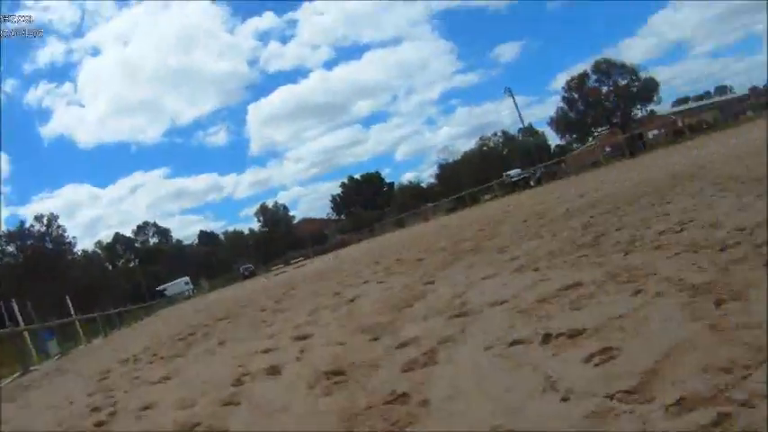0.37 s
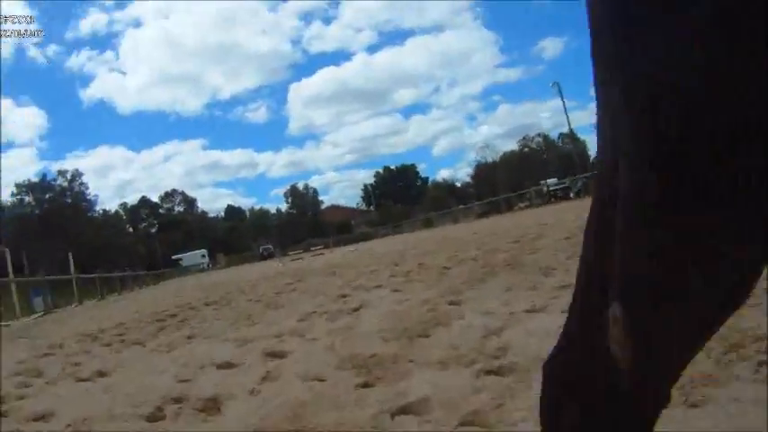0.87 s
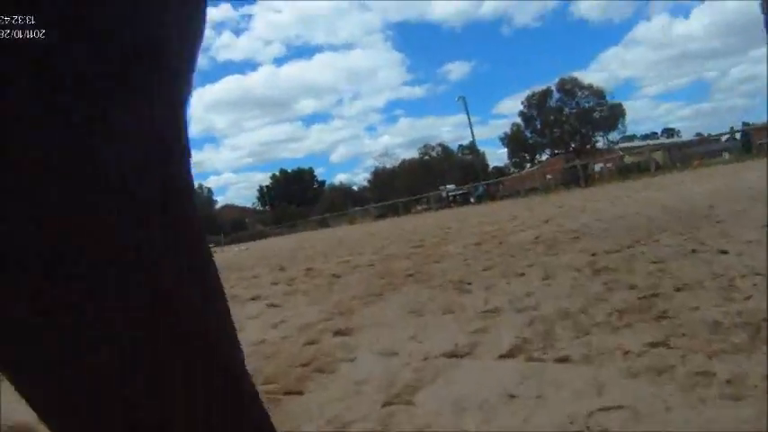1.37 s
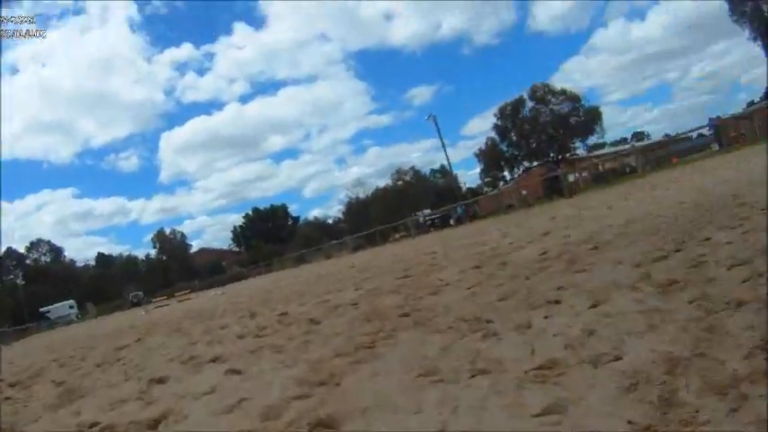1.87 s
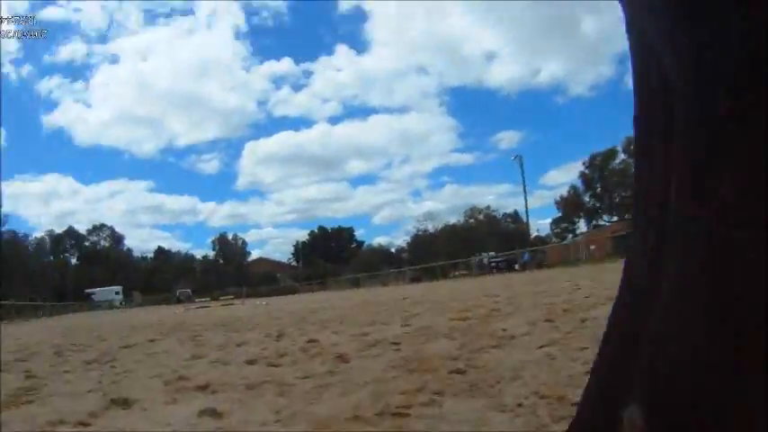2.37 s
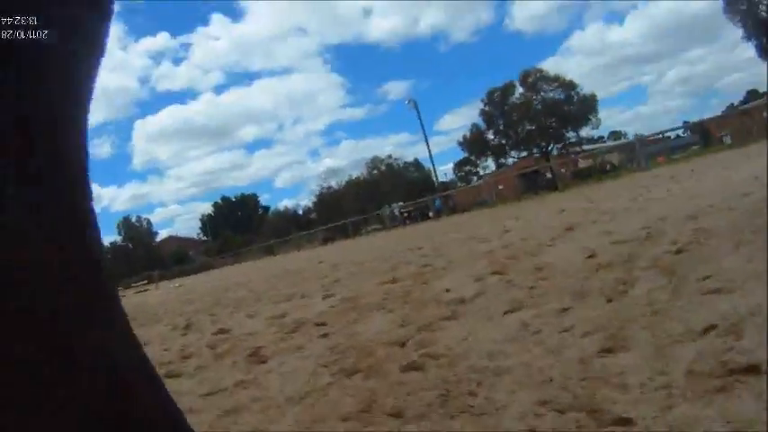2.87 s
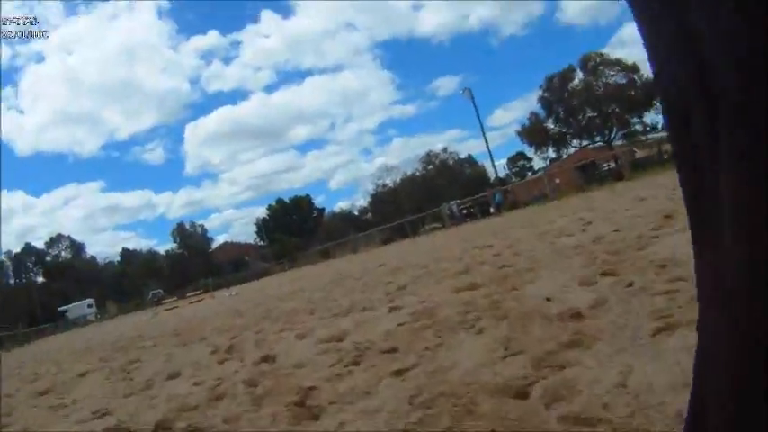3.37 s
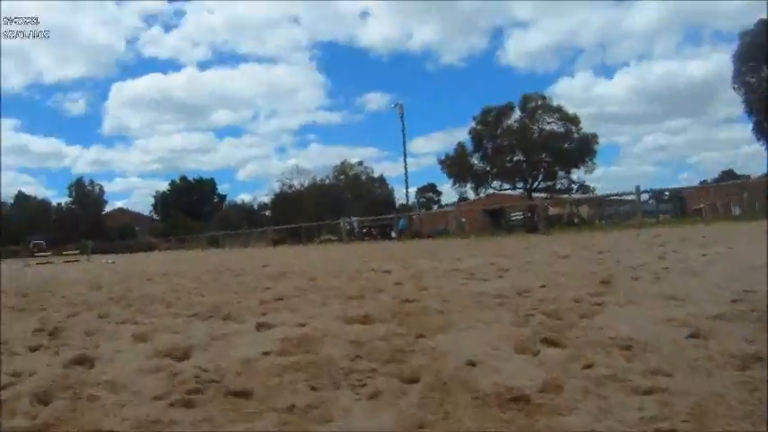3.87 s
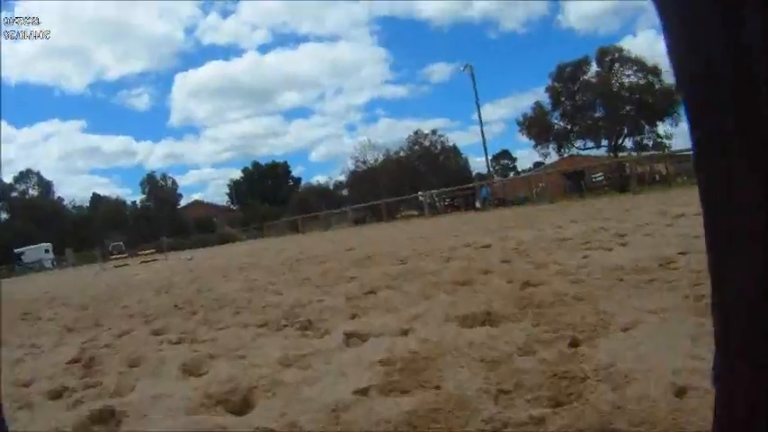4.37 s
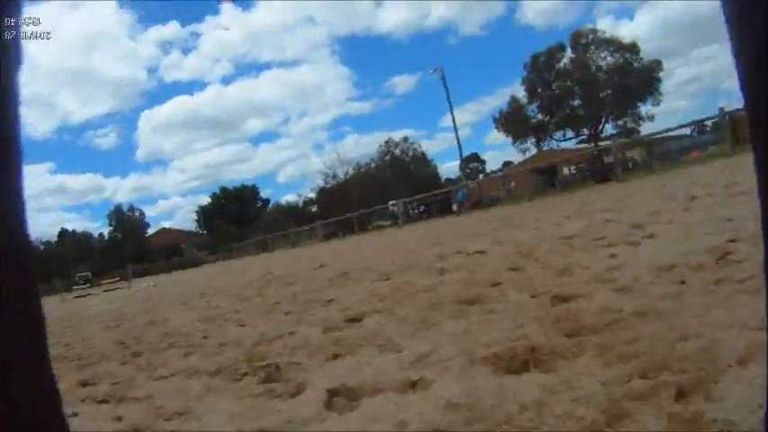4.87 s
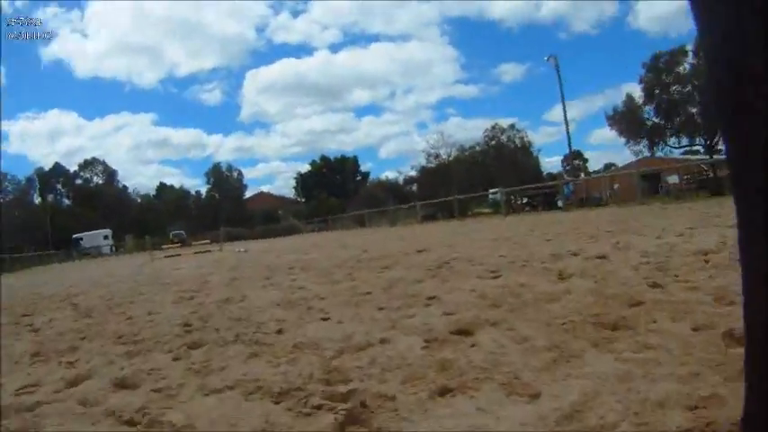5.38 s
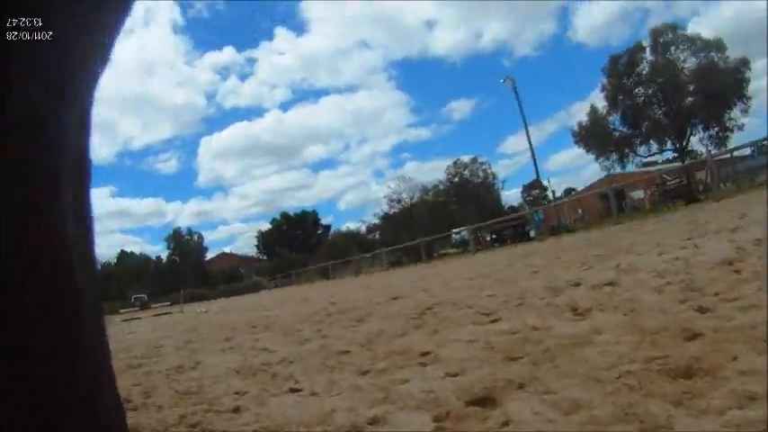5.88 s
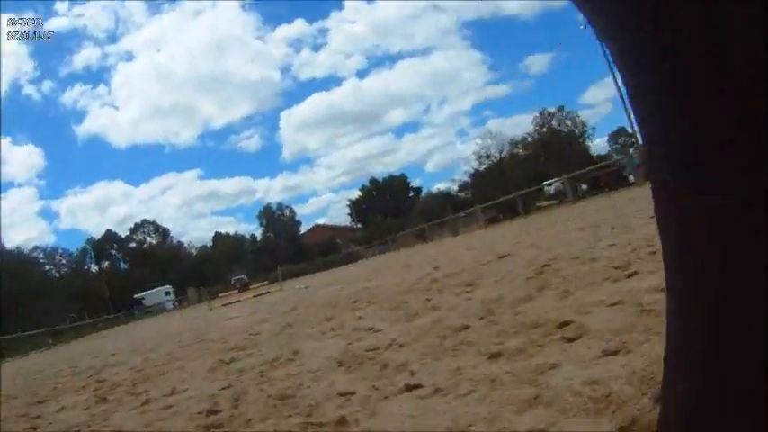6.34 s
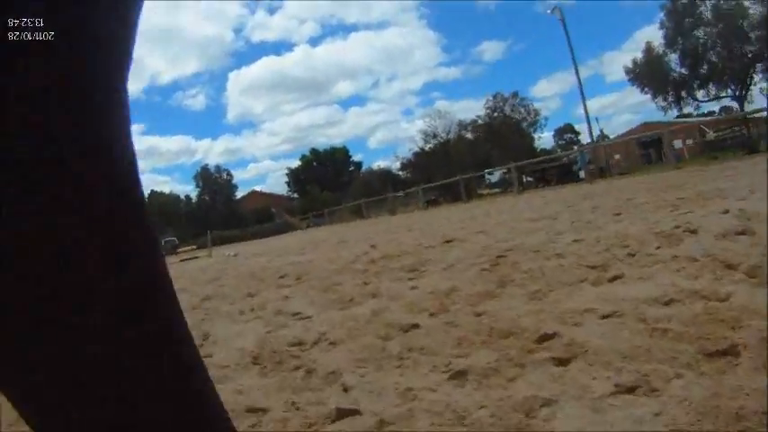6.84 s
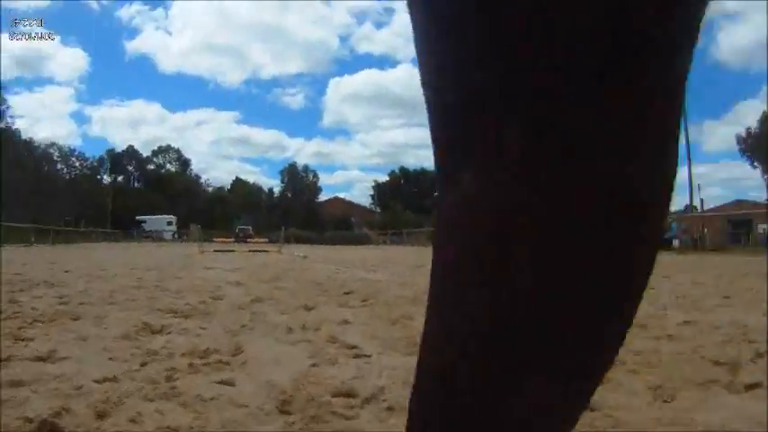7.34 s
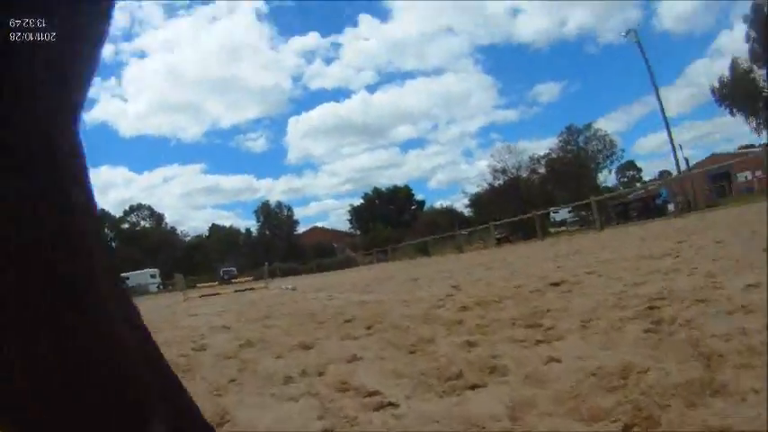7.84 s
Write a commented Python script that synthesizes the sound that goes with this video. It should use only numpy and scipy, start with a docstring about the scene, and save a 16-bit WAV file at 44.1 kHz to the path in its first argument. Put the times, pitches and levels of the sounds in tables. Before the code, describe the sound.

Hollow plastic knocks and tiny chattering ticks run continuously, broken by short overloaded rubbing bursts, soft sandy swishes and low thuds over steady hiss.

```python
"""A small camera in a closed plastic housing knocks against its mount on the girth of a walking horse.
Each knock rings the housing modes; strap and leg scrape it with dense slips until the input overloads.
The mount chatters in tiny touches, hooves thud as short lumps of rumble, and hair and kicked sand
swish as swelling filtered noise, over the steady hiss of the electronics."""
import sys
import numpy as np
from scipy import signal
from scipy.fft import rfft, irfft, next_fast_len
from scipy.io import wavfile

SR = 44100
rng = np.random.default_rng(int(sys.argv[2]) if len(sys.argv) > 2 else 0)


def master_out(mix):
    """Clip the mix to full scale and print it as 16-bit PCM to the path in sys.argv[1]."""
    frames = np.transpose(np.atleast_2d(mix))
    ceiling = np.clip(frames, -1, 1)
    pcm = np.round(ceiling * 32767).astype(np.int16)
    wavfile.write(sys.argv[1], SR, pcm)


def undo_db(level):
    """Turn decibels back into plain size, where 20 dB means ten times bigger."""
    steps = np.asarray(level, float) / 20
    return 10 ** steps


N = 362924

# lower and upper modes of the plastic housing: (frequency [Hz], relative level [dB], t60 [s])
LOW_MODES = [(393, -14.5, 0.011), (658, -9, 0.013), (1095, -1, 0.013), (1330, -2, 0.026),
             (1470, -1.5, 0.022), (1700, -4, 0.019), (1964, 0.5, 0.0099), (2414, -3.5, 0.0072)]
HIGH_MODES = [(3090, -8, 0.0088), (3690, -1.5, 0.0086), (4380, -5, 0.004), (5036, -13.5, 0.0093),
              (6280, -19.5, 0.0047), (7890, -29, 0.011), (10300, -24.5, 0.001), (14500, -20.5, 0.0015)]
# air behind the microphone port: (frequency [Hz], t60 [s])
PORT_CAVITY = (1480, 0.0083)


def rms_one(x):
    """Scales a signal to rms 1."""
    return x / np.sqrt(np.mean(x ** 2) + 1e-20)


def in_time(rows, outside=None):
    """Draws straight lines between timed rows, one curve per column."""
    s, *columns = np.transpose(rows)
    t = np.arange(N) / SR
    return np.array([np.interp(t, s, column, outside, outside) for column in columns])


def drift(rate_hz):
    """Slow random wander of rms 1: noise through two equal one-pole low-passes."""
    r = np.exp(-2 * np.pi * rate_hz / SR)
    noise = rng.standard_normal(N + SR)
    # the first second lets the filter settle
    return rms_one(signal.lfilter([1], [1, -2 * r, r * r], noise)[SR:])


def coloured(spectrum):
    """Noise of rms 1 shaped to a spectrum of (frequency [Hz], relative density [dB])."""
    hz, level_db = np.transpose(spectrum)
    size = next_fast_len(N)
    bins_hz = np.maximum(np.fft.rfftfreq(size, 1 / SR), 1)
    shape = undo_db(np.interp(np.log(bins_hz), np.log(hz), level_db))
    noise = rng.standard_normal(size)
    return rms_one(irfft(shape * rfft(noise), size)[:N])


def soften(x, hz):
    """A padded contact spreads the force over a short time: a low-pass at hz."""
    return signal.sosfilt(signal.butter(4, hz, fs=SR, output="sos"), x)


def ring(force, hz, t60):
    """One resonance: a unit click rings at a height of about 1; a steady force moves nothing."""
    r = undo_db(-60 / (t60 * SR))
    w = 2 * np.pi * hz / SR
    return signal.lfilter([.5, 0, -.5], [1, -2 * r * np.cos(w), r * r], force + 1e-18)


def shell(force, modes):
    """One force drives all the modes; neighbours swing in opposite senses."""
    out = np.zeros(N)
    for k, (hz, level_db, t60) in enumerate(modes):
        out += (-1) ** k * undo_db(level_db) * ring(force, hz, t60)
    return out


def grains(per_s, spread_db):
    """Random slips of uneven size and either sign, per_s of them a second on average."""
    sizes = undo_db(spread_db * np.minimum(rng.exponential(1, N), 4)) * rng.choice([-1, 1], N)
    return sizes * (rng.random(N) < per_s / SR)


def hiss():
    """Electronics: steady coloured noise."""
    # hiss colour: (frequency [Hz], relative density [dB])
    hiss_colour = [(20, -33.5), (240, -26.5), (700, -23), (1200, -20), (1470, -5), (1800, -19),
                   (2700, -32.5), (4800, -21.5), (6900, -38.5), (15600, -43)]
    return undo_db(-43.5) * coloured(hiss_colour)


def swishes():
    """Hair and kicked sand as the legs pass: flickering treble noise under bell-shaped swells."""
    # swish colour: (frequency [Hz], relative density [dB])
    swish_colour = [(300, -17.5), (2200, -14.5), (3000, -10), (3700, -8.5), (4900, -3), (6000, -16),
                    (8000, -22), (15000, -38.5)]
    # passes of the legs: (time of peak [s], swell level [dB], width [s])
    passes = [(.02, -47.5, 0.074), (.27, -46, 0.043), (.59, -43, 0.058), (.8, -48.5, .1), (.98, -44, 0.047),
              (1.12, -42.5, 0.068), (1.33, -47, 0.14), (1.72, -43.5, 0.074), (2.1, -45.5, 0.14),
              (2.45, -46, 0.14), (2.88, -47.5, 0.16), (3.1, -45.5, 0.12), (3.33, -44, 0.061),
              (3.75, -40, 0.075), (4.18, -38.5, 0.04), (4.72, -43.5, 0.095), (5.05, -39, 0.027),
              (5.17, -40.5, 0.057), (5.28, -45.5, 0.025), (5.82, -40, 0.098), (6.33, -45, 0.14),
              (6.67, -50, .05), (6.86, -42, .06), (6.99, -37.5, 0.056), (7.33, -47.5, 0.035),
              (7.55, -40, .07), (7.7, -45, 0.062), (8.1, -49.5, 0.11)]
    t = np.arange(N) / SR
    power = sum(undo_db(2 * db) * np.exp(-((t - s) / width) ** 2) for s, db, width in passes)
    flicker_db = 2.6 * drift(45.0) + 1.17 * drift(17.5)
    return np.sqrt(power) * coloured(swish_colour) * undo_db(flicker_db)


def thuds():
    """Hoof jolts felt through the strap: lumps of band-passed noise, quick to rise and slower to die."""
    # jolts: (time of peak [s], level [dB], centre [Hz])
    jolts = [(0.205, -38, 155), (0.399, -43, 149), (0.762, -37, 156), (0.825, -34, 149), (1.051, -43, 159),
             (1.502, -42, 97), (1.563, -35, 140), (2.126, -41, 152), (2.269, -34.5, 152), (2.718, -42, 119),
             (2.763, -38.5, 171), (2.934, -34.5, 160), (2.993, -36, 166), (3.797, -49, 170),
             (3.943, -35.5, 107), (4.186, -45, 164), (4.382, -32, 90), (4.88, -36.5, 70), (5.778, -42, 160),
             (5.916, -34, 65), (5.944, -36, 72.6), (6.485, -31, 64), (6.925, -46, 147), (7.074, -26.5, 94),
             (7.194, -45, 147), (7.593, -44, 166), (8.188, -39, 51)]
    out = np.zeros(N)
    t = np.arange(-.03 * SR, .08 * SR) / SR
    rise_s, decay_s = .004, .013
    shape = np.exp(-np.abs(t) / np.where(t < 0, rise_s, decay_s))
    noises = rng.standard_normal((len(jolts), len(t)))
    for (s, level_db, hz), noise in zip(jolts, noises):
        band = signal.butter(1, [hz / 2.5, hz * 2], "band", fs=SR, output="sos")
        rumble = signal.sosfiltfilt(band, noise)
        rumble = rumble / np.sqrt(np.average(rumble ** 2, weights=shape ** 2))
        lump = undo_db(level_db) * shape * rumble
        at = np.round((s + t) * SR).astype(int)
        inside = (at >= 0) & (at < N)
        out[at[inside]] += lump[inside]
    return out


def pressure():
    """Gains of drag and grit: each scrape touches, swells to full pressure and lets go fast."""
    # scrapes: (contact [s], full pressure [s], let-go [s], dull drag level [dB], bright grit level [dB])
    strokes = [(2.673, 2.685, 2.722, -9, -13), (2.703, 2.713, 2.729, 2, -13),
               (3.489, 3.516, 3.559, -4, -13.5), (3.9, 3.936, 3.89, -23, -21),
               (3.946, 3.957, 3.96, -2.5, -6.5), (4.374, 4.381, 4.394, -18, -25),
               (4.39, 4.408, 4.413, -1.5, -10), (4.426, 4.439, 4.448, -5.5, -22),
               (4.871, 4.878, 4.892, -19, -22), (4.894, 4.902, 4.912, -5, -1.5),
               (5.401, 5.406, 5.42, -15, -23), (5.415, 5.434, 5.487, -6, -16.5),
               (5.912, 5.927, 5.934, -11, -21), (5.94, 5.942, 5.951, -7, -3),
               (6.488, 6.513, 6.527, -7.5, -15), (7.073, 7.077, 7.086, -3, -14),
               (7.085, 7.097, 7.117, -9, -2), (8.173, 8.183, 8.2, -19, -23), (8.201, 8.21, 8.216, -8, -3)]
    # pairs are drag, grit
    swell_db = np.array([24.5, 22.5])  # gain from contact to full pressure
    fall_db_per_s = np.array([1900, 2500])  # after letting go
    touch_s, touch_rise_db = .005, 26  # just ahead of the contact
    release_s = .04
    out = np.zeros((2, N))
    for contact, full, let_go, *top_db in strokes:
        top_db = np.array(top_db)
        contact_db = top_db - swell_db
        rows = [(contact - touch_s, *(contact_db - touch_rise_db)),
                (contact, *contact_db),
                (full, *top_db),
                (let_go, *top_db),
                (let_go + release_s, *(top_db - release_s * fall_db_per_s))]
        out = np.maximum(out, undo_db(in_time(rows, outside=-120)))
    return out


def chatter():
    """The mount chatters in clumped tiny touches on shell and cavity; a scrape leaves it shaking."""
    # strength of the chatter: (time [s], level [dB])
    strength = [(0.0, -34.5), (1.17, -38), (1.28, -39.5), (2.43, -39), (2.79, -37), (3.83, -46.5),
                (3.94, -32.5), (4.33, -45), (4.49, -50), (4.95, -35), (5.66, -43), (5.94, -35.5),
                (6.28, -44.5), (6.44, -34), (6.83, -46), (7.08, -36), (7.56, -43), (8.23, -35.5)]
    after_shake_db, after_shake_t60_s = -17.5, 0.2
    r = undo_db(-60 / (after_shake_t60_s * SR))
    drag, _ = pressure()
    after_shake = undo_db(after_shake_db) * signal.lfilter([1 - r], [1, -r], drag)
    shake = undo_db(in_time(strength)[0]) + after_shake
    clumps = undo_db(8.6 * np.minimum(drift(32.0), 1.6))
    touches = grains(2500.0, spread_db=2.5) * clumps
    low = soften(shell(touches, LOW_MODES), 2400)
    cavity = undo_db(-2.5) * ring(touches, *PORT_CAVITY)
    high = undo_db(-6.5) * soften(shell(touches, HIGH_MODES), 6900)
    return shake * rms_one(low + cavity + high)


def scrapes():
    """Strap and leg: dense stick-slip drives the shell and sings in the cavity, catching in clumps."""
    drag, grit = pressure()
    catch = undo_db(2.2 * drift(90.0))

    slips = grains(3000.0, spread_db=0.0)
    dull_shell = rms_one(soften(shell(slips, LOW_MODES), 2820))
    # two resonances in a row at the pitch of the cavity
    cavity = rms_one(ring(ring(slips, *PORT_CAVITY), PORT_CAVITY[0], 0.011))
    dull = rms_one(undo_db(-9) * dull_shell + cavity)

    fine = grains(8000.0, spread_db=4.0)
    bright_shell = rms_one(shell(fine, HIGH_MODES))
    upper_ring = undo_db(-2.0) * rms_one(ring(fine, 4454, 0.0065))
    lower_ring = undo_db(-1.5) * rms_one(ring(fine, 2565, 0.0064))
    bright = rms_one(bright_shell + upper_ring + lower_ring)
    return catch * (drag * dull + grit * bright)


def knock_rows():
    """The clear knocks, plus the light taps that bounce a short random time after some of them."""
    # clear knocks of camera on mount:
    # (time [s], strike level [dB], centre of the ring [Hz], sharpness: treble against ring [dB])
    clear = np.array([(.052, -6, 1670, -16), (0.0734, -5, 1200, -31), (.0975, -13, 1660, -17),
                      (0.149, -8.5, 1310, -22), (0.2032, -6.5, 1410, -16), (0.2107, -14, 1450, -22),
                      (0.242, -16, 1460, -22), (.2605, -16, 1650, -16), (.3313, -2.5, 1560, -33),
                      (0.3626, -4, 1520, -16.5), (.3942, -8.5, 1680, -11), (.418, -1.5, 1220, -9.5),
                      (0.4294, -11.5, 1640, -0.5), (.434, -5.5, 1370, -25), (.444, -13, 1270, -10),
                      (.469, -3.5, 1660, -14), (0.5012, -7, 1370, -35), (0.5469, -11.5, 1730, -11),
                      (0.5796, 0.5, 1700, -8.5), (0.6563, -10, 1380, -31), (0.7671, -2, 1700, -26),
                      (.8146, 1, 1420, -13.5), (0.8196, -1.5, 1370, -17), (.854, -16, 1680, -18),
                      (.862, -12.5, 1540, -13), (.892, -7, 1400, -19), (0.9478, -5.5, 1330, -15),
                      (0.9645, -13, 1530, -17), (0.9971, -9.5, 1750, 1), (1.0098, -8.5, 1500, -22),
                      (1.045, 0, 1260, -25), (1.1, -15.5, 1420, -14), (1.145, -8.5, 1460, -17),
                      (1.1545, 4, 1900, -11.5), (1.1578, -15, 1420, -17), (1.2048, -10.5, 1470, -25),
                      (1.296, -13, 1390, -28), (1.3024, -4, 1470, -3.5), (1.3587, -8.5, 1510, -25),
                      (1.411, -8, 1330, -17), (1.471, -8, 1370, -14), (1.4943, -4.5, 1760, -36),
                      (1.5488, -5.5, 1410, -16), (1.5585, 2.5, 1360, -12), (1.62, -11.5, 1730, -31),
                      (1.629, -11.5, 2000, -12), (1.7062, -17, 1420, -11), (1.743, -6.5, 1530, -5),
                      (1.7602, -4.5, 1350, -9.5), (1.8155, -3.5, 1270, -37), (1.8334, -9.5, 1470, -34),
                      (1.8594, -15, 1400, -22), (1.8687, -1, 1640, -18), (1.881, -6, 1400, -16),
                      (1.8907, -4, 1820, -7.5), (1.9223, -15, 1720, -16), (2.123, 0.5, 1350, -7),
                      (2.129, -9.5, 1570, -27), (2.1393, -15, 1730, -8), (2.2802, -5.5, 1680, 0),
                      (2.3102, -8, 1440, -27), (2.3243, -2, 1260, -22), (2.3389, -10.5, 1310, -25),
                      (2.3539, -4.5, 1230, -16), (2.464, -14, 1370, -13), (2.4867, -17.5, 1390, -19),
                      (2.5579, -14, 1220, -30), (2.6282, -4.5, 1910, -10), (2.751, -17, 1600, -16),
                      (2.7656, -1.5, 1440, -13), (2.7744, -20, 1770, -2), (2.8087, -2, 1300, -19),
                      (2.8164, -6, 1760, -21), (2.927, -4, 1810, -3.5), (2.9326, -6, 1300, -13),
                      (2.982, -12, 1450, -12), (2.9912, -13, 1430, -17), (3.047, -15.5, 1330, -12),
                      (3.0615, -7.5, 1470, -11), (3.1567, -4, 1780, -38), (3.223, -10, 1360, -28),
                      (3.2942, -15, 1350, -19), (3.321, -5, 1470, -11), (3.3259, -3.5, 1410, -18),
                      (3.3487, -2, 1450, -10), (3.4035, -6, 1500, -10), (3.4105, -0.5, 1210, -31),
                      (3.492, -14.5, 1700, 5.5), (3.599, -12, 1430, -20), (3.621, -12.5, 1380, -10),
                      (3.737, -4.5, 1340, -23), (3.7492, -17, 1470, -14), (3.7764, 6.5, 1430, -12.5),
                      (3.7775, -1.5, 1310, -8), (3.7955, 1.5, 2010, -7), (3.821, -2, 1730, -8.5),
                      (3.9278, -3, 1350, -17), (3.935, -1.5, 1530, -8), (3.9926, -17, 1410, -12),
                      (4.0733, -6.5, 1290, -10), (4.1406, -8, 1340, -25), (4.217, 1.5, 1640, -10.5),
                      (4.22, -18, 1470, -14), (4.2578, -6, 1500, 0.5), (4.34, -15.5, 1470, -30),
                      (4.382, -7, 1490, -9), (4.4469, 1.5, 1530, -5.5), (4.4696, -7, 1750, -7.5),
                      (4.4868, -12.5, 1430, -13), (4.5006, -13.5, 1590, -12), (4.6501, -6, 1320, -35),
                      (4.6986, -12.5, 1470, -17), (4.7052, -3.5, 1270, -20), (4.7576, -1.5, 1700, -16),
                      (4.8307, -8, 1330, -12), (4.8738, 1, 1880, 0), (4.882, -2.5, 1760, -17),
                      (4.925, -17, 1390, -20), (5.0335, -10.5, 1480, -13), (5.0424, -17, 1650, -8),
                      (5.0699, -6.5, 1300, -14), (5.167, -6, 1620, -14.5), (5.1757, -11.5, 1440, -18),
                      (5.2194, -18, 1420, -23), (5.2447, -7.5, 1650, -8.5), (5.3068, -16, 1270, -35),
                      (5.3212, -16, 1390, -25), (5.3376, -13, 1330, -40), (5.5022, 1, 1960, -7),
                      (5.5893, 0.5, 1370, -7.5), (5.6699, 1, 1510, -34), (5.676, -11, 1460, -33),
                      (5.689, -4.5, 1430, -22), (5.6972, -6, 1370, -9.5), (5.7786, 1, 1610, -5.5),
                      (5.7855, -3, 1770, -4.5), (5.7914, -10, 1390, -24), (5.8877, -9.5, 1360, -22),
                      (5.914, -14.5, 1710, 2), (5.9198, -7, 1900, -4), (5.9254, 0, 1430, -8),
                      (5.959, -14, 1380, -17), (5.9658, -10.5, 1360, -31), (6.0713, -6, 1310, -17),
                      (6.1108, -15, 1380, -32), (6.2236, -13.5, 1300, -37), (6.2758, -17, 1420, -20),
                      (6.4058, -14, 1060, -25), (6.4832, -9, 1470, -0.5), (6.495, -1.5, 1570, -28),
                      (6.606, -5.5, 1450, 3.5), (6.6215, 1, 1840, -7), (6.7207, -1.5, 1270, -8),
                      (6.8214, 4.5, 1430, -7), (6.9123, -6.5, 1370, -19), (6.924, -5, 1540, -3.5),
                      (6.9446, -5, 1571, -19), (7.0214, -17, 1470, -17), (7.049, -9.5, 1420, -29),
                      (7.0771, 10.5, 1610, -23), (7.135, -12, 1400, -22), (7.1882, -2.5, 1330, -24),
                      (7.1935, -13.5, 1530, -4), (7.2302, -16, 1550, -7), (7.2519, -7, 1270, -19),
                      (7.32, -11.5, 1470, -14), (7.3886, -14, 1360, -30), (7.438, 2.5, 1650, -10),
                      (7.5383, -6, 1510, -1), (7.588, -9, 1210, -27), (7.6338, -15, 1210, -28),
                      (7.7414, -14.5, 1310, -18), (7.7627, -9.5, 1450, -13), (7.7833, -10, 1410, -15),
                      (7.7913, -9.5, 1610, -3.5), (7.7951, 0, 1940, -21), (7.867, -10.5, 1530, -15),
                      (7.961, 5.5, 1450, -8), (8.0155, -10.5, 1360, -21), (8.048, -14, 1350, -23),
                      (8.0681, -2, 1330, -11), (8.104, -16, 1370, -21), (8.1147, -8.5, 1570, -19),
                      (8.182, -7.5, 1758, -21), (8.188, -5, 1410, -2), (8.224, -1, 1500, -8)])
    bounce_share = .4
    soonest_s, spread_s = .005, 0.013
    mean_loss_db = 17
    luck = rng.random((len(clear), 5))
    tap_s = clear[:, 0] + soonest_s - spread_s * np.log(luck[:, 0] + 1e-3)
    tap_db = clear[:, 1] - mean_loss_db * (.5 + luck[:, 1])
    tap_hz = 1450 * (0.86 + 0.17 * luck[:, 2])
    tap_sharp_db = -17 + 13.0 * (luck[:, 3] - .5)
    taps = np.transpose([tap_s, tap_db, tap_hz, tap_sharp_db])
    return np.vstack([clear, taps[luck[:, 4] < bounce_share]])


def knocks():
    """Knocks favour modes near their centre; sharp ones excite the high modes; small rebounds trail."""
    s, strike_db, centre_hz, sharp_db = knock_rows().T
    at = np.minimum(np.round(s * SR).astype(int), N - 1)
    chance = rng.standard_normal((len(at), len(LOW_MODES) + len(HIGH_MODES) + 1))
    low_chance, high_chance = chance[:, :len(LOW_MODES)], chance[:, len(LOW_MODES):-1]
    sign = np.sign(chance[:, -1])

    def strike(modes, total_db, aim_db):
        """Shares the blow's strength out among the modes, keeping the summed power."""
        share = undo_db(np.array(modes)[:, 1] + aim_db)
        share = share / np.sqrt(np.sum(share ** 2, axis=1, keepdims=True))
        out = np.zeros(N)
        for k, (hz, _, t60) in enumerate(modes):
            force = np.zeros(N)
            force[at] = sign * (-1) ** k * undo_db(total_db) * share[:, k]
            out += ring(force, hz, t60)
        return out

    octaves_off = np.log2(np.array(LOW_MODES)[:, 0] / centre_hz[:, None])
    off_centre_loss_db = np.minimum(60.0 * octaves_off ** 2, 9.0)
    body = strike(LOW_MODES, strike_db, 4 * low_chance - off_centre_loss_db)

    # weak blows are slow contacts and lose the highest modes
    octaves_up = np.log2(np.array(HIGH_MODES)[:, 0] / HIGH_MODES[0][0])
    reach_db = 1.6 * np.minimum(strike_db, 0)[:, None] * octaves_up
    tick = strike(HIGH_MODES, strike_db + sharp_db, 4.1 * high_chance + reach_db)

    blows = np.zeros(N)
    blows[at] = undo_db(strike_db)
    settling_t60_s = .06
    settling = signal.lfilter([1], [1, -undo_db(-60 / (settling_t60_s * SR))], blows)
    rebounds = grains(1100.0, spread_db=4.0) * settling
    low_trail = undo_db(-28.5) * soften(shell(rebounds, LOW_MODES), 2930)
    high_trail = undo_db(-38.5) * soften(shell(rebounds, HIGH_MODES), 9800)
    return soften(body, 3500) + soften(tick, 14400) + low_trail + high_trail


def scene():
    """All sources summed at the microphone, as one channel."""
    return (hiss() + swishes() + thuds() + chatter() + scrapes() + knocks())[None]


def roll_off(x):
    """The treble ends steeply here."""
    return signal.sosfilt(signal.butter(12, 15730, fs=SR, output="sos"), x)


def record(dry):
    """The overloaded input clips almost flat, then a steep low-pass cuts the top."""
    overload = .97  # full scale = 1
    clipped = dry / (1 + np.abs(dry / overload) ** 9.0) ** (1 / 9.0)
    low_pass = signal.ellip(10, .5, 60, 15700, fs=SR, output="sos")
    finished = signal.sosfilt(low_pass, clipped)
    return roll_off(finished)


dry = scene()
out = record(dry)
master_out(out)
```